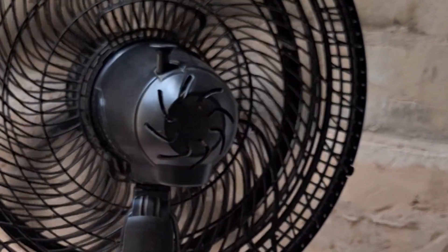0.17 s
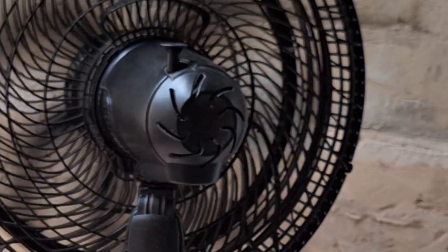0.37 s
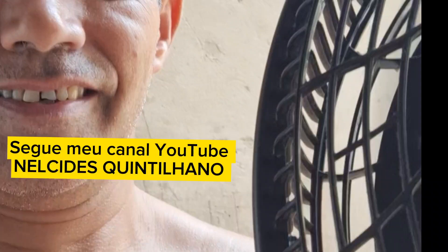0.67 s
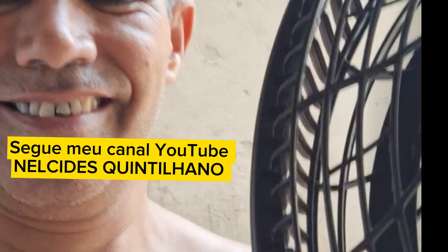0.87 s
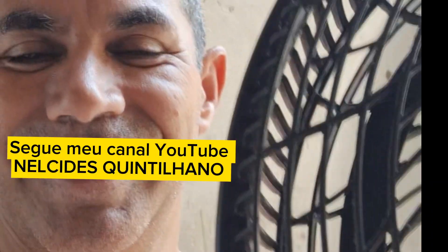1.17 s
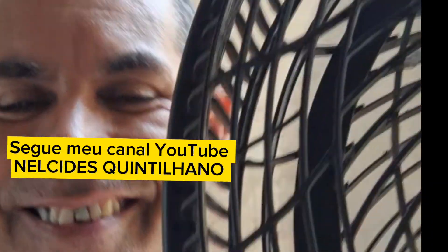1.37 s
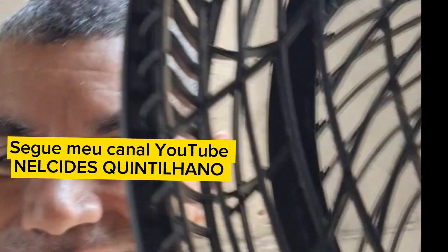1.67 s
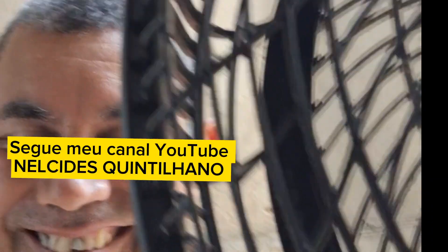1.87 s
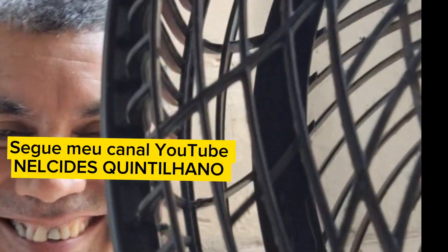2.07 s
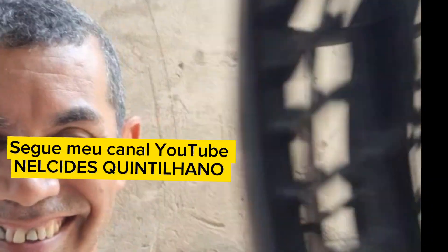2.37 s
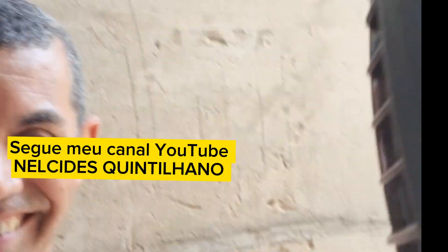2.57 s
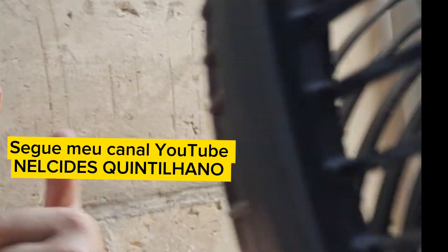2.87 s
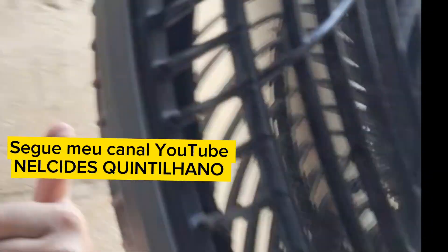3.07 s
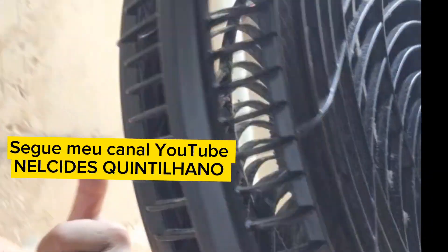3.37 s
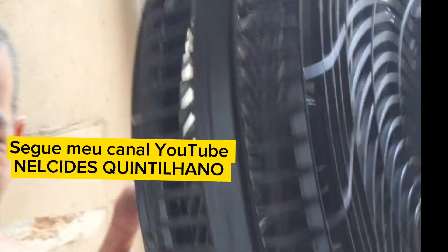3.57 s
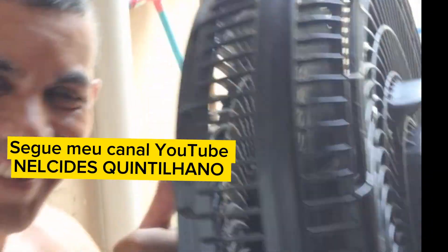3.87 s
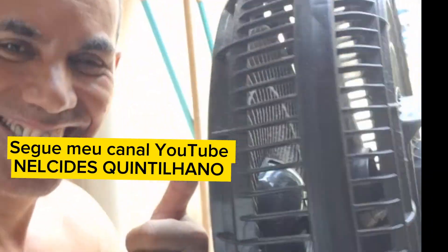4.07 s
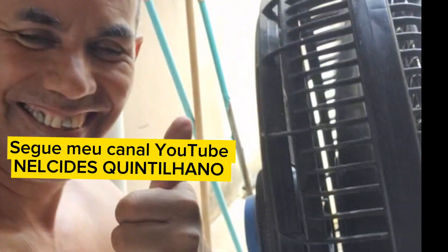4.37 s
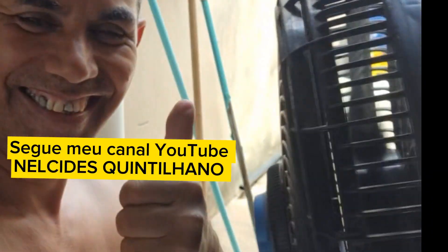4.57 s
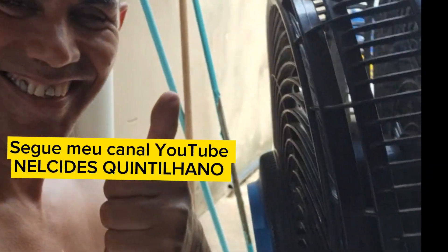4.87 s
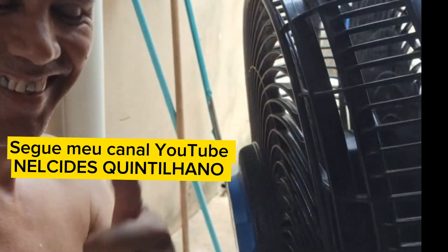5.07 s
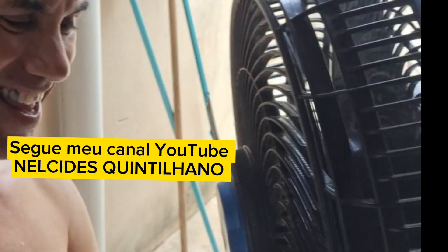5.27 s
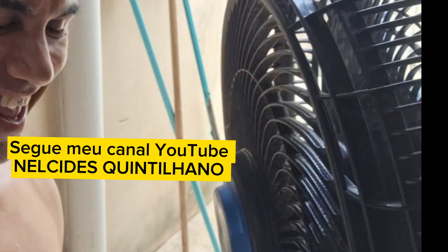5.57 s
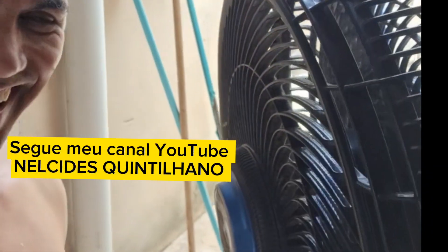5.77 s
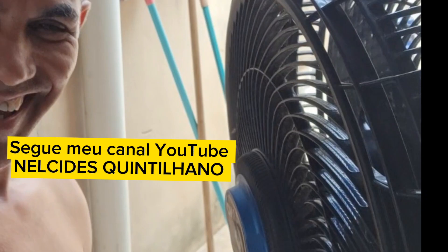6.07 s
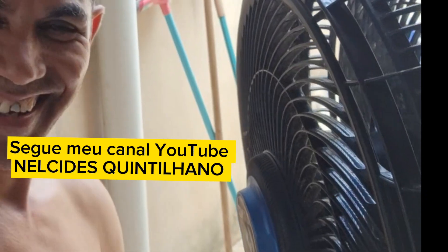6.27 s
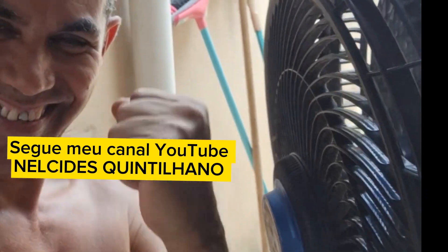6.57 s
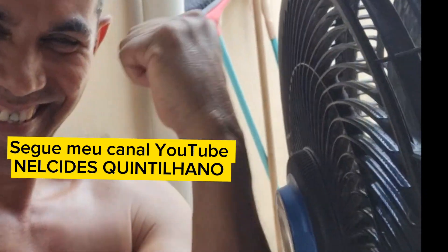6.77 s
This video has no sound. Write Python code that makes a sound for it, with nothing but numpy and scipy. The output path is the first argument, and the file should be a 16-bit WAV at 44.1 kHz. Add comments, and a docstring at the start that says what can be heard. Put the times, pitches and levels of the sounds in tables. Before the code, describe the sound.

Close, loud rush of air from a standing fan over a low hum and rumble, broken once by a click and short silence.

```python
"""Close by a six-bladed pedestal fan, at a hand-held microphone: rushing air, a throbbing low hum,
faint fan tones and the rumble of eddies shed by the blades. Behind the motor the housing rings in
the intake noise. The sound cuts out with a click and returns beside the cage, where the hum is
strongest, then moves round to the front, where the air is brighter and the hum fades."""
import sys
import numpy as np
from scipy import signal
from scipy.fft import rfft, irfft, next_fast_len
from scipy.io import wavfile
from scipy.ndimage import uniform_filter1d, minimum_filter1d, map_coordinates

SR = 44100
rng = np.random.default_rng(int(sys.argv[2]) if len(sys.argv) > 2 else 0)


def wrap_up_sound(samples):
    """Save the sound to the file named by the first command line argument, as 16-bit audio."""
    columns = np.atleast_2d(samples).T
    # keep every value between -1 and 1, then stretch to whole-number steps
    tamed = np.clip(columns, -1, 1)
    steps = np.round(tamed * 32767).astype(np.int16)
    wavfile.write(sys.argv[1], SR, steps)


N = 304731

CUT_S, RESUME_S = 0.6585, 0.966
SHAFT_HZ, BLADES = 19.04, 6


def amp(db):
    """Decibels to gain."""
    return 10 ** (np.asarray(db) / 20)


def unit(x):
    """Scale to rms 1."""
    return x / np.sqrt(np.mean(x ** 2) + 1e-20)


def time_s():
    """Time of every sample."""
    return np.arange(N) / SR


def curves(rows):
    """One value per sample for each column after the time."""
    knots_s, *columns = np.transpose(rows)
    return [np.interp(time_s(), knots_s, column) for column in columns]


def along(points, hz):
    """Read (f/Hz, value) points on a log axis."""
    knots_hz, values = np.transpose(points)
    return np.interp(np.log(hz + 1), np.log(knots_hz + 1), values)


def shape(points):
    """Response of (f/Hz, level/dB) points, falling steeply past both ends."""
    skirt = lambda hz: np.minimum(1, np.minimum(hz / points[0][0], points[-1][0] / (hz + 1))) ** 6
    return lambda hz: amp(along(points, hz)) * skirt(hz)


def filtered(x, response):
    """Apply a frequency response."""
    size = next_fast_len(N + SR // 2)
    return irfft(rfft(x, size) * response(np.fft.rfftfreq(size, 1 / SR)), size)[..., :N]


def wobble(rate_hz):
    """Smooth random curve of rms 1, with knots at the given rate."""
    knots = rng.standard_normal(int(N * rate_hz / SR) + 4)
    return unit(map_coordinates(knots, [time_s() * rate_hz]))


def panned(lean_db):
    """Left and right gains for a left-over-right level."""
    return amp(np.array([lean_db, -lean_db]) / 2)


def fuzzy_tone(hz, width_hz):
    """Tone of rms 1 with wandering strength and phase."""
    phase = 2 * np.pi * hz * time_s()
    return unit(wobble(width_hz) * np.cos(phase) + wobble(width_hz) * np.sin(phase))


# Default stereo coherence of the air: f/Hz, correlation
AIR_COHERENCE = [(200, 1), (550, 0.63), (1650, .42), (3000, 0.12), (5000, .02)]


def turbulence(colour, lean, patchy_db, coherence=AIR_COHERENCE):
    """Stereo noise with random gain patches in time and frequency; mid rms 1."""
    spectra = signal.stft(rng.standard_normal((2, N)), nperseg=512)[2]
    patches = uniform_filter1d(rng.standard_normal(spectra.shape[1:]), size=6, axis=0)
    patches = uniform_filter1d(patches, size=12, axis=1)
    pair = signal.istft(spectra * amp(patchy_db * unit(patches)), nperseg=512)[1][:, :N]
    angle = lambda hz: np.arccos(np.clip(along(coherence, hz), -1, 1)) / 2
    mid, side = filtered(pair, lambda hz: colour(hz) * [np.cos(angle(hz)), np.sin(angle(hz))])
    stereo = filtered(np.array([mid + side, mid - side]), lambda hz: panned(along(lean, hz)))
    return stereo / np.std(stereo.mean(axis=0))


# Intake rush and grille hiss spectra: f/Hz, level/dB
REAR_RUSH = [(130, -14.5), (170, -12), (230, -4.5), (310, -0.5), (420, -6), (500, -8), (780, -10.5),
             (1000, -11.5), (1250, -15), (1700, -15.5), (2750, -24), (3100, -30.5)]
REAR_HISS = [(3400, -2), (4480, -3), (4840, -5.5), (5400, -4.5), (7000, -7.5), (11600, -12.5), (15800, -25)]
# Motor housing and rear grille modes: f/Hz, width/Hz, level/dB
HOUSING_MODES = [(298, 7.8, -1), (355.5, 12, -2), (488, 6.5, -4.5), (923, 12, -7.5), (986, 28, -13.5),
                 (1620, 98, -18.5)]
# Rear balance: f/Hz, left over right/dB
REAR_LEAN = [(60, 6), (110, 0.5), (200, 5), (380, -3), (700, 6.5), (1290, -2.5), (2380, -4.5), (4400, 7.5),
             (8120, -0.5), (15000, -6)]
# Rear coherence: f/Hz, correlation
REAR_COHERENCE = [(300, 1), (550, 0.3), (1650, .1), (5000, .03)]


def intake_air():
    """Intake noise behind the motor, with the housing ringing and the blades beating in it."""
    def modes(hz):
        return sum(amp(db) * 1j * hz * width_hz / (mode_hz ** 2 - hz ** 2 + 1j * hz * width_hz)
                   for mode_hz, width_hz, db in HOUSING_MODES)

    stream = lambda colour: turbulence(colour, REAR_LEAN, patchy_db=0.7, coherence=REAR_COHERENCE)
    rush = amp(-20) * stream(shape(REAR_RUSH))
    ring = amp(-24) * filtered(stream(modes), shape([(220, 0.0011), (2400, 0)]))
    hiss = amp(-45) * stream(shape(REAR_HISS))
    beat = amp(-23.5) * fuzzy_tone(BLADES * SHAFT_HZ, width_hz=2.5)
    return rush + ring + hiss + beat


# Microphone path round the cage: t/s, frontness/0-1
MIC_PATH = [(1.0, 0.3), (1.5, 0.21), (2.0, 0.06), (2.8, 0), (3.4, 0.26), (4.0, 0.72), (4.6, 0.82),
            (5.5, 0.95), (6.9, 0.94)]


def frontness():
    """How far the microphone is round to the front, 0-1."""
    return np.clip(curves(MIC_PATH)[0], 0, 1)


# Draught on the left microphone port: t/s, strength/0-1
PORT_DRAUGHT = [(0.65, .12), (1.1, 0.2), (2.3, 0.4), (2.75, 1), (3.15, .5), (3.6, 0.31), (4.4, 0)]


def draught():
    """How squarely the draught strikes the left port, 0-1."""
    return np.clip(curves(PORT_DRAUGHT)[0], 0, 1)


# Low-end swells and lulls: centre t/s, length/s, gain/dB
LOW_SWELLS = [(0.027, 0.064, 8), (0.21, .16, 4), (0.32, 0.046, -9), (0.36, 0.031, 7), (0.48, 0.077, 6.5),
              (1.197, 0.09, 8.5), (1.388, 0.13, 4.5), (1.64, 0.047, 5), (1.855, 0.051, 8.5),
              (1.927, 0.08, -6), (2.085, 0.081, 4), (2.25, 0.048, 5.5), (2.378, 0.055, 5), (2.74, .06, -4),
              (2.815, 0.087, 8), (3.0, 0.077, 4), (3.587, 0.18, 3.5), (5.548, .12, 7), (6.06, 0.073, 6.5),
              (6.565, 0.11, 10), (6.8, .14, 7.5)]


def swell_db():
    """Bell-shaped rises and dips of the low end."""
    return sum(db * np.exp(-(2 * (time_s() - centre_s) / length_s) ** 2)
               for centre_s, length_s, db in LOW_SWELLS)


# Hum between swells: t/s, level/dB
HUM_LEVEL = [(0, -15), (0.65, -19), (1.0, -9), (1.3, -10), (2.2, -7.5), (2.5, -14), (2.9, -13.5),
             (3.3, -10), (3.85, -8.5), (3.95, -16), (4.45, -30), (5.4, -24), (6.9, -26)]


def hum(hz=100.0, wander_rad=0.2, draught_lean_db=12):
    """Low swelling drone; the draught raises its flutter and pulls both to the left."""
    t, blow, lift_db = time_s(), draught(), swell_db()
    lead_rad = 0.28 * np.array([[1], [-1]]) * (t > CUT_S) * (1 - frontness())
    drone = np.sqrt(2) * np.sin(2 * np.pi * hz * t + lead_rad + wander_rad * wobble(7.7))
    drone *= amp(curves(HUM_LEVEL)[0] + lift_db)
    shared = fuzzy_tone(hz, width_hz=28)
    per_port = np.array([fuzzy_tone(hz, width_hz=32) for port in range(2)])
    flutter = amp(-24 + 7 * blow + 0.6 * lift_db) * unit(shared + 0.4 * per_port)
    pan = panned(draught_lean_db * blow)
    return (drone + flutter) * pan / pan.mean(axis=0)


# Fan tones, some near shaft harmonics, others between them:
# f/SHAFT_HZ, side level/dB, front level/dB, width/Hz
FAN_TONES = [(2.986, -39.5, -38.5, 3), (6.056, -23.5, -31, 2.005), (11.97, -66, -25.5, 16),
             (15.8, -37, -37.5, 8), (18.29, -36, -38.5, 10), (28.08, -42.5, -37.5, 30),
             (41.5, -48, -36.5, 14), (50.44, -50.5, -36, 45)]


def fan_tones(rotor_order=22):
    """Faint tones blurred by the uneven inflow, and the rotor's clearer whine."""
    front = frontness()
    tones = sum(amp(side_db + front * (front_db - side_db)) * fuzzy_tone(ratio * SHAFT_HZ, width_hz)
                for ratio, side_db, front_db, width_hz in FAN_TONES)
    rotor = np.sqrt(2) * np.sin(2 * np.pi * rotor_order * SHAFT_HZ * time_s() + 0.4 * wobble(3))
    whine = amp(-32 - 17 * (1 - front) + 2.1 * wobble(3.5)) * rotor
    return (tones + whine) * panned(2.8 * (1 - front))


# Loudness as heard, briefly higher just after the sound returns: t/s, rush level/dB, hiss level/dB
HEARD_LEVELS = [(1.0, -20.5, -47.5), (1.1, -14, -39), (1.25, -17, -42), (1.5, -19.5, -45.5),
                (1.72, -18, -43), (2.2, -19.5, -44.5), (2.7, -21, -44), (3.2, -20, -43.5), (4.1, -22, -44),
                (4.7, -21, -43.5), (5.3, -20, -42), (6.9, -19.5, -41.5)]
# Eddy spectrum: f/Hz, level/dB
EDDY_SPECTRUM = [(10, -23), (30, -19.5), (45, -3.5), (60, 1.5), (85, 6.5), (120, -5.5), (160, -9),
                 (260, -37.5)]


def rumble():
    """Eddies shed by the blades follow rush level and swells; the draught buffets the left port."""
    blow, rush_db = draught(), curves(HEARD_LEVELS)[0]
    eddy_db = -26 + 3.5 * blow + 0.9 * (rush_db - rush_db.mean()) + 0.45 * swell_db()
    eddies = turbulence(shape(EDDY_SPECTRUM), lean=[(100, 1.5)], patchy_db=2,
                        coherence=[(25, 0.6), (60, 1)])
    port_colour = shape([(15, -16), (45, -3.5), (100, 2), (180, -7), (400, -21.5)])
    buffet = np.array([[1], [0]]) * unit(filtered(rng.standard_normal(N), port_colour))
    buffet_db = -32 + 13.5 * blow + 2.2 * wobble(6.1)
    return amp(eddy_db) * eddies + amp(buffet_db) * buffet


# Rush and grille-wire hiss spectra: f/Hz, level/dB
SIDE_RUSH = [(130, -1), (175, -7), (220, -5.5), (300, -10), (470, -12.5), (530, -11.5), (670, -10),
             (740, -14), (1110, -15), (1700, -22.5), (2600, -27.5), (3100, -35.5)]
SIDE_HISS = [(2060, -28), (3500, -1.5), (3800, -0.5), (4860, 0.5), (6100, -7), (8000, -6.5), (10100, -13),
             (15100, -20.5), (15800, -24.5)]
FRONT_RUSH = [(76, -53), (130, -15), (162, -5.5), (194, -8), (226, -5), (370, -9), (414, -6), (488, -9.5),
              (530, -7.5), (728, -8.5), (790, -8), (1600, -15), (3500, -31.5), (4550, -58), (7700, -120)]
FRONT_HISS = [(2060, -35.5), (3500, 0), (6620, -8.5), (8150, -8.5), (9240, -14), (11200, -11.5),
              (12600, -15.5), (13700, -22), (15100, -21), (15800, -26)]
# Balance: f/Hz, left over right/dB
SIDE_LEAN = [(100, -3), (380, 4.5), (700, 3.5), (1300, -1), (3000, 2)]
FRONT_LEAN = [(100, .7), (380, 0.86), (700, -2.3), (1300, -3.9), (3000, -1.5)]
FRONT_HISS_LEAN = [(3000, 1), (4400, -0.5), (8000, 0.5), (11000, -10), (15000, 1)]
# Side rush coherence: f/Hz, correlation
SIDE_COHERENCE = [(150, 0.77), (550, 0.93), (1650, 0.064), (3000, .02)]


def cage_air():
    """The stream is dull beside the cage, brighter in front; each passing blade chops it slightly."""
    rush_db, hiss_db = curves(HEARD_LEVELS)
    front = frontness()
    side_rush = turbulence(shape(SIDE_RUSH), SIDE_LEAN, patchy_db=1.5, coherence=SIDE_COHERENCE)
    side_hiss = turbulence(shape(SIDE_HISS), lean=[(4000, 0.5), (15000, -1)], patchy_db=1.1)
    front_rush = turbulence(shape(FRONT_RUSH), FRONT_LEAN, patchy_db=0.4)
    front_hiss = turbulence(shape(FRONT_HISS), FRONT_HISS_LEAN, patchy_db=1.2)
    beside = amp(rush_db + 0.9) * side_rush + amp(hiss_db + 0.7) * side_hiss
    ahead = amp(rush_db + 0.87 + 0.086 * swell_db()) * front_rush + amp(hiss_db - 0.1) * front_hiss
    chop = 1 + 0.03 * np.sin(2 * np.pi * BLADES * SHAFT_HZ * time_s())
    flicker = amp(0.41 * wobble(22))
    return (np.sqrt(1 - front) * beside + np.sqrt(front) * ahead) * chop * flicker


def scene():
    """The fan from behind, then from the side and front."""
    air = np.where(time_s() < CUT_S, intake_air(), cage_air())
    return air + hum() + fan_tones() + rumble()


def limiter(x, ceiling, hold_s):
    """Turn both channels down around any peak above the ceiling."""
    size = int(hold_s * SR)
    gain = np.minimum(1, ceiling / (np.abs(x).max(axis=0) + 1e-9))
    return x * uniform_filter1d(minimum_filter1d(gain, size), size)


def record(dry):
    """A click, a pause and a quick fade-in, then peak limiting and a band limit."""
    fade_s, click_decay_s, top_hz = 0.064, 0.0003, 15900
    t = time_s()
    before_cut = t < CUT_S
    fade_in = (t > RESUME_S) * np.clip(0.17 + (t - RESUME_S) / fade_s, 0, 1)
    click = 0.7 * before_cut * np.exp(-np.abs(t - CUT_S) / click_decay_s)
    sound = limiter(dry * (before_cut + fade_in) + click, ceiling=1, hold_s=0.029)
    return filtered(sound, lambda hz: np.clip((top_hz - hz) / 40 + 0.5, 0, 1))


dry = scene()
out = record(dry)
wrap_up_sound(out)
```